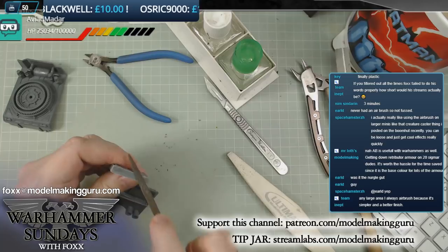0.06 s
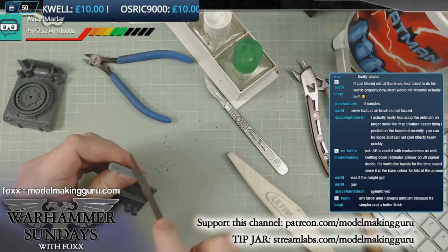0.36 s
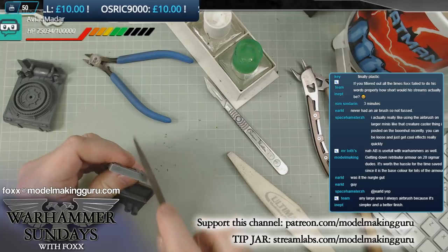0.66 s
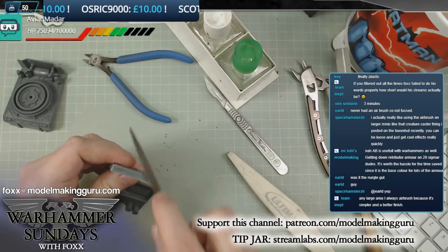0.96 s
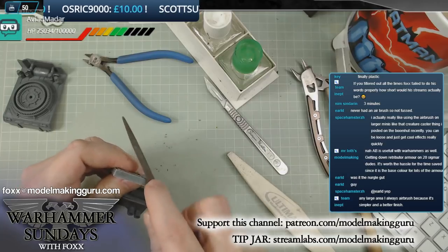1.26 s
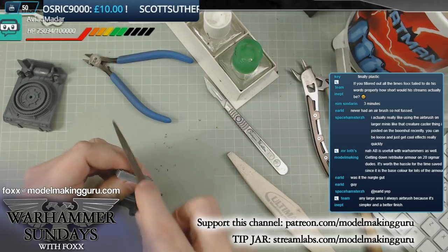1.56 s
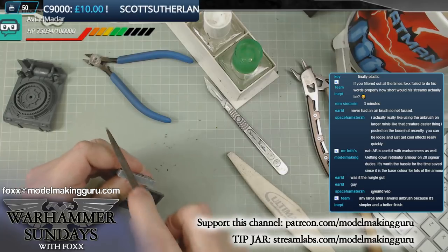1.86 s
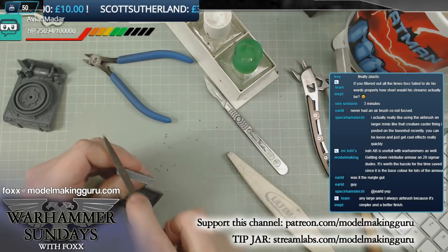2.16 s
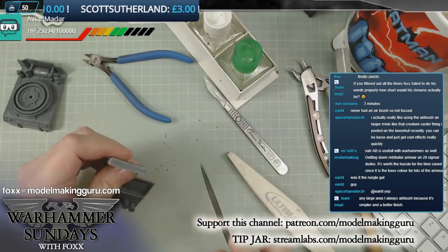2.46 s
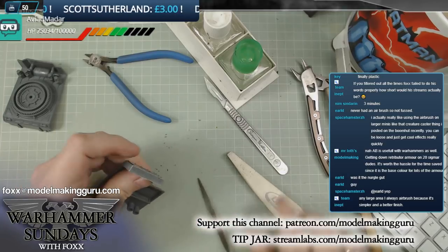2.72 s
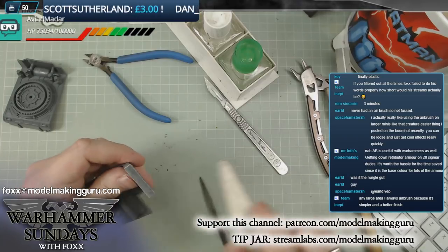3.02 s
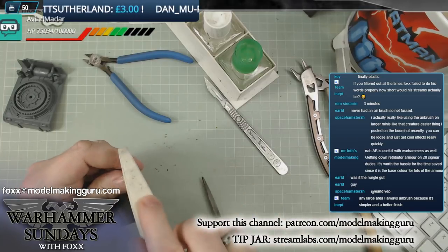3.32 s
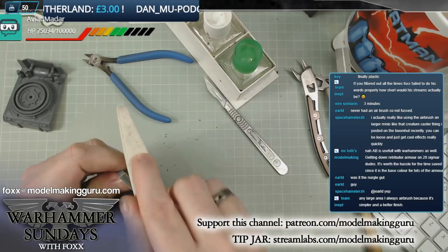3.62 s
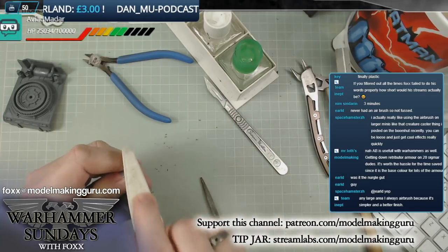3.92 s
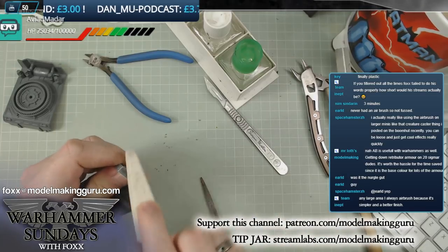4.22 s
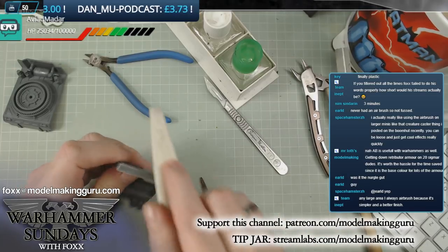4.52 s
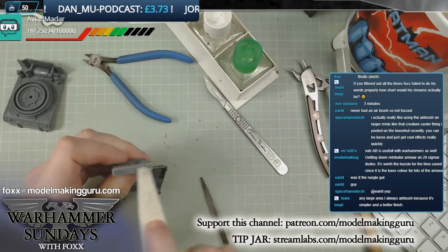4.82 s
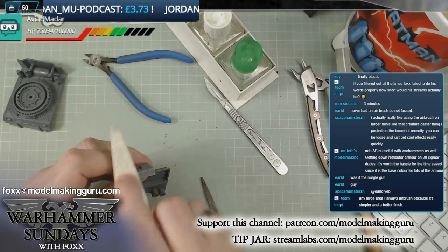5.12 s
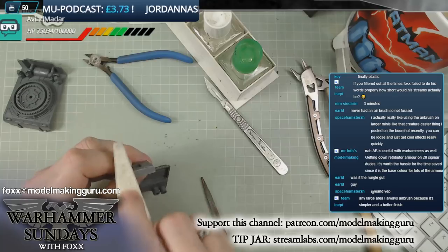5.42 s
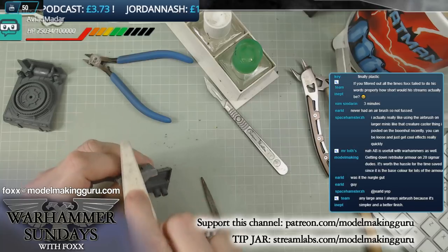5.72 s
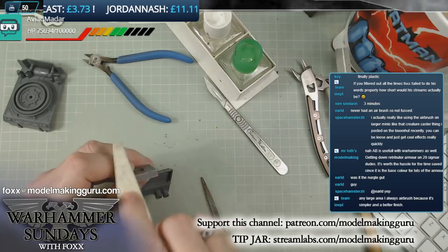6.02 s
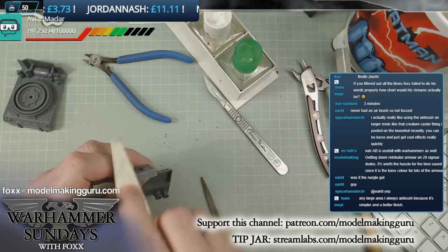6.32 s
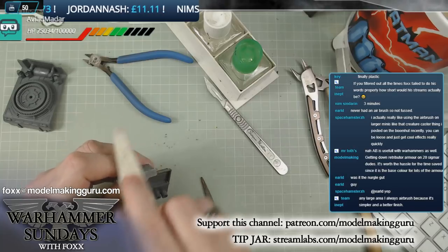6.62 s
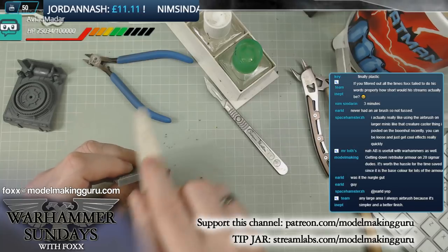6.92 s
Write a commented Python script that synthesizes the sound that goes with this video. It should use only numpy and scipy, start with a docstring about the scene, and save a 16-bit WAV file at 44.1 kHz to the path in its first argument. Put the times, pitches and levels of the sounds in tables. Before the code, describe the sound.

Close, dry filing on hollow plastic, a clack and thump on a desk, then gritty sanding strokes that get faster and louder.

```python
"""A small hollow plastic model part is smoothed by hand over a desk, in a quiet dry room.
First come seven strokes of a metal file: the blade lands with a tick, then its teeth catch the
plastic in tiny snaps that make the part ring. The file is put down, and the desk clacks and booms.
Next the grit of a sanding stick scrapes the part in three slow strokes. The fingers turn the part
with a dull pop and a faint rub, and seven quicker, harder strokes follow on another edge."""
import sys
import numpy as np
from scipy import signal
from scipy.fft import rfft, irfft, next_fast_len
from scipy.io import wavfile

SR = 44100
rng = np.random.default_rng(int(sys.argv[2]) if len(sys.argv) > 2 else 0)


def store_wav(level_fs):
    """Save 16-bit WAV to argv[1]."""
    pcm = np.round(np.clip(np.atleast_2d(level_fs), -1, 1) * 32767)
    wavfile.write(sys.argv[1], SR, pcm.T.astype(np.int16))


N = 307377

# The broad tone colour of each sound: (frequency [Hz], level [dB])
AIR_SPECTRUM = [(120, -27.5), (200, -0.5), (721, -5), (1130, -6), (1330, -4.5), (1510, -10.5),
                (3120, -10.5), (5860, -26.5), (15000, -18.5)]
RUMBLE_SPECTRUM = [(40, -12.5), (100, 1), (155, -4), (200, -10.5), (300, -15.5), (450, -23), (900, -38.5),
                   (2000, -65.5)]
SWAY_SPECTRUM = [(5, -2.5), (12, 7.5), (25, -12), (55, -16.5), (100, -18), (300, -70)]
FINGER_SPECTRUM = [(200, -24.5), (450, 4), (700, -17.5), (1100, 0), (1750, -2), (2100, -30.5), (5000, -44)]
CLACK_SPECTRUM = [(100, -20.5), (300, -0.5), (520, -4.5), (750, -7.5), (1350, -3), (1900, -16.5),
                  (4500, -12.5), (7000, -18.5), (9500, -38), (15000, -57)]
TICK_SPECTRUM = [(200, -26.5), (600, -15.5), (1200, -1), (2700, 11.5), (4200, 9.5), (5800, -3.5),
                 (7300, 0.5), (8800, -21), (10000, -39), (15000, -54)]
FILE_FRICTION = [(150, 4), (330, -28.5), (500, -2.5), (780, -8), (900, -20), (1350, -14.5), (2100, -3.5),
                 (3100, -5.5), (5200, -1), (6300, -3.5), (8200, -4), (9500, -7.5), (12000, -9),
                 (15500, -33.5)]
SLOW_FRICTION = [(150, -16.5), (350, -12.5), (580, -4), (860, -33.5), (1350, -18.5), (1900, 5.5), (2200, 4),
                 (2800, 14.5), (4800, 9.5), (6100, 0.5), (8800, 0.5), (10400, -18), (13000, -18.5),
                 (15500, -66)]
QUICK_FRICTION = [(200, -45), (480, -26), (800, -19.5), (900, -29), (1350, -25.5), (1900, -13.5),
                  (2200, -16), (2750, -4.5), (3900, -12), (5600, -20), (8000, -8.5), (10000, -18),
                  (12500, -19.5), (15500, -32.5)]
# Resonances, the narrow peaks (or dips) on top of that colour: (frequency [Hz], width [Hz], boost [dB])
AIR_HUM = [(286, 17, 22)]
RUMBLE_RESONANCES = [(162, 38, 14), (179, 25, 1.6)]
FINGER_RESONANCES = [(420, 80, 28), (1710, 65, 15)]
CLACK_RESONANCES = [(263, 110, 10), (360, 210, 4.5), (560, 110, -2.5), (636.5, 55, 9), (775, 100, 8),
                    (920, 46, -1), (1230, 57, -1), (1280, 35, -0.5), (1473, 55, 3.5), (2150, 590, 8),
                    (2530, 200, 0)]
TICK_RESONANCES = [(1165, 60, 13.5), (1673, 230, 9), (3713, 150, 6), (3960, 250, -10), (7220, 220, -10)]
FILE_RESONANCES = [(1075, 314, 33), (1559, 170, 25), (2820, 240, 4), (3681, 130, 11), (4055, 180, -21),
                   (4550, 96, 4), (6800, 570, 8.5)]
SLOW_RESONANCES = [(1060, 510, 41.5), (1562, 140, 16.5), (3360, 180, -1), (3960, 220, -5)]
QUICK_RESONANCES = [(1042, 270, 25), (1630, 280, 12), (2375, 310, 8.5), (2934, 1100, 8), (4760, 1160, 15),
                    (4980, 290, -16.5), (5443, 1800, 14.5)]
# The room's echo; a fade time, or t60, is how long a drop of 60 dB takes: (frequency [Hz], fade time [s])
ROOM_FADE = [(200, 0.42), (1200, 0.22), (3500, 0.16), (8000, 0.13), (15000, 0.22)]
# The desk rumbles as the forearms settle on it after the change of tools: (time [s], level [dB])
LEANING = [(3.1, -53), (3.226, -62.5), (4.316, -74.5), (4.586, -77), (5.0, -90.5)]
# Fingertips slide as the part is turned: (time [s], level [dB])
FINGER_RUB = [(4.725, -120), (4.74, -76.5), (4.79, -87), (4.87, -83.5), (4.99, -85.5), (5.05, -120)]
# Tools slide over the mat as they are swapped: (time [s], length [s], pitch [Hz], level [dB])
SLIDES = [(2.783, 0.13, 5600, -75), (2.89, 0.087, 3170, -63.5), (2.986, 0.06, 3870, -65),
          (3.07, 0.081, 4750, -67.5)]
# The part shifts in the fingers: (time [s], level [dB], pitch [Hz])
GRIP_POPS = [(4.735, -58, 472), (5.692, -60.5, 330), (6.008, -58.5, 310), (6.303, -56, 320),
             (6.578, -82, 356), (6.792, -50, 460), (6.808, -49, 436)]
# The tones the desk top rings with: (frequency [Hz], level [dB], fade time [s])
DESK_TONES = [(57.34, -4, 0.64), (109.5, -11, 0.33), (153, 1.5, 0.2), (189, -2, 0.14), (233, -7, 0.054),
              (273, -13, 0.047), (282, -12, 0.057), (325, -2.5, 0.099), (676, -13, 0.11), (782, -20, 0.09),
              (1270, -22.5, 0.078), (1334, -14.5, 0.04), (1460, -19, 0.097), (2080, -27.5, .07)]
# Blows on the desk: (time [s], thud gain [dB], clack level [dB], clack's treble limit [Hz])
KNOCKS = [(0.841, -46.5, -86, 890), (2.559, -43.5, -41, 3270), (2.569, -58, -54, 1470),
          (2.617, -35.5, -50.5, 866), (2.6639, -31, -28.5, 3940), (2.6768, -53, -33.5, 1770),
          (2.7, -36.5, -46.5, 2350), (2.804, -64, -57, 1160), (2.82, -30.5, -41.5, 2640),
          (2.824, -21, -55, 484), (2.85, -54.5, -49, 4000), (2.957, -64, -64, 917),
          (3.015, -66.5, -60.5, 775), (3.097, -47, -42, 1940), (3.133, -54, -53.5, 1110),
          (3.25, -50, -56.5, 800), (3.412, -64, -55, 1200), (3.53, -53.5, -63, 1110),
          (3.569, -56.5, -55.5, 1210), (3.667, -51.5, -75.5, 980), (3.712, -49.5, -61, 1120),
          (3.744, -60, -74, 1220), (3.819, -57, -79.5, 1380), (4.002, -55.5, -72, 1200),
          (4.101, -51, -86, 1200), (4.238, -56.5, -97, 1200), (4.511, -60.5, -86.5, 1195),
          (4.66, -63, -85, 1200)]
# The tool lands or catches an edge:
# (time [s], click level [dB], ring over click [dB], hiss over click [dB], boosted pitch [Hz])
TICKS = [(0.0401, -44, -19.5, -11, 3700), (0.391, -51, -16, -45, 3480), (0.739, -52.5, -9, -21, 2750),
         (0.796, -57, -30, -9, 5600), (1.104, -52.5, -6.5, -32, 3640), (1.438, -52, -12, -33, 4000),
         (1.76, -54, -9, -23.5, 4540), (2.068, -57, 1, -9.5, 1550), (2.191, -52.5, -5, -5.5, 3000),
         (2.329, -83, 13.5, -28, 1700), (3.332, -62.5, -3, -34, 1860), (3.732, -75.5, 9.5, -35, 1070),
         (3.866, -58, -6.5, -27, 3320), (4.099, -64, -8, -20, 3000), (4.248, -80.5, -4, -31, 2860),
         (4.462, -62, -21, -13.5, 3580), (4.735, -82.5, 25.5, -27, 1434), (4.995, -69, 0, -36, 2420),
         (5.373, -72, -1.5, -32, 1980), (5.582, -62.5, -11, -18, 3020), (5.691, -61, -4, -41, 1850),
         (5.886, -60, -10, -18, 4460), (6.005, -59.5, -10, -41, 2430), (6.187, -56.5, -7.5, -26, 3070),
         (6.301, -58, -9.5, -30, 3523), (6.467, -58, -6.5, -18, 3240), (6.577, -61.5, -11, -26, 2370),
         (6.741, -54.5, -12, -34, 4600), (6.806, -61, 4, -30, 1690), (6.838, -62, 4, -34, 1770),
         (6.881, -51.5, -3, -25, 2800)]
# Moves of the tool: (start [s], fastest moment [s], end [s], scrape level [dB], ring over scrape [dB],
# hiss over scrape [dB], pitch boosted by the point of contact [Hz], its boost [dB], desk rumble [dB])
FILE_STROKES = [(0.05, 0.146, 0.22, -52, -9, -14, 3720, 9, -70),
                (0.409, 0.511, 0.55, -49.5, -10, -14.5, 3650, 7.5, -64),
                (0.756, 0.824, 0.85, -50, -6, -11.5, 3625, 10, -61),
                (1.097, 1.176, 1.243, -49.5, -8, -12.5, 3590, 8.5, -75),
                (1.45, 1.511, 1.606, -50.5, -4.5, -18, 3800, 4.5, -65),
                (1.763, 1.842, 1.943, -56.5, -9, -24.5, 5600, 4.5, -76.5),
                (2.104, 2.212, 2.268, -51.5, -7, -19, 2960, 3.5, -70)]
SLOW_STROKES = [(3.406, 3.553, 3.622, -48.5, -7.5, -19, 640, 12, -64.5),
                (3.881, 3.992, 4.11, -48.5, -7, -14.5, 4430, 2.5, -68.5),
                (4.275, 4.368, 4.492, -46, -10.5, -14, 4560, 6.8, -74)]
QUICK_STROKES = [(5.024, 5.137, 5.212, -42.5, -7, -21.5, 2650, 5.7, -90),
                 (5.395, 5.492, 5.59, -40.5, -11, -20, 3800, 1.9, -99),
                 (5.72, 5.805, 5.89, -40.5, -12.3, -20, 2480, 1, -91),
                 (6.02, 6.094, 6.188, -39.5, -14.5, -16, 4420, 1.7, -87),
                 (6.312, 6.389, 6.485, -39.5, -13.5, -16.5, 3500, 2.4, -78),
                 (6.593, 6.652, 6.74, -38.3, -17.5, -17, 4759, 3.6, -86),
                 (6.777, 6.832, 6.885, -58.5, -3, -43, 433, 18, -73),
                 (6.851, 6.935, 6.985, -39.5, -14, -15.5, 4700, 3.1, -74.5)]


def from_db(db):
    """Turn decibels into a number to multiply a sound by."""
    return 10 ** (np.asarray(db) / 20)


def rms(x):
    """The average strength of a sound (root mean square)."""
    return np.sqrt(np.mean(x ** 2) + 1e-24)


def at_hz(points, hz):
    """Read between the rows of a table, with every octave equally wide."""
    frequencies, values = np.transpose(points)
    return np.interp(np.log(np.maximum(hz, 1)), np.log(frequencies), values)


def keep_band(x, hz, kind, order=2):
    """Keep the lows, the highs or a band in between."""
    return signal.sosfilt(signal.butter(order, hz, kind, fs=SR, output="sos"), x)


def drift(rate_hz):
    """A random wobble of strength 1 that heads for a new value rate_hz times a second."""
    wobble = np.interp(np.arange(N) / SR * rate_hz, np.arange(N), rng.standard_normal(N))
    return wobble / rms(wobble)


def response(spectrum, resonances=(), size=8192):
    """How an object with this colour and these resonances answers one sharp tap."""
    hz = np.arange(size // 2 + 1) * SR / size
    peaks_db = sum(db / (1 + (2 * (hz - centre) / width) ** 2) for centre, width, db in resonances)
    cepstrum = irfft(np.log(from_db(at_hz(spectrum, hz) + peaks_db)))
    # folding the second half onto the first puts all the ringing after the tap
    cepstrum[1:size // 2] *= 2
    cepstrum[size // 2 + 1:] = 0
    return irfft(np.exp(rfft(cepstrum)))


def through(x, tap_response):
    """Pass a sound through an object or a room."""
    return signal.fftconvolve(x, tap_response)[:len(x)]


def noise(spectrum, resonances=()):
    """Noise of a given colour and strength 1."""
    x = through(rng.standard_normal(N), response(spectrum, resonances))
    return x / rms(x)


def add(out, start_s, sound):
    """Mix a sound in at a given time."""
    i = int(start_s * SR)
    out[i:i + len(sound)] += sound[:N - i]


def split_bands(x):
    """Split a sound into the hollow ring (low), the bite (middle) and the fine hiss (high)."""
    size = next_fast_len(len(x) + 512)
    hz, spectrum = np.arange(size // 2 + 1) * SR / size, rfft(x, size)
    below_bite, below_hiss = (1 / (1 + (hz / edge_hz) ** 18) for edge_hz in (2000, 7800))
    shares = below_bite, below_hiss - below_bite, 1 - below_hiss
    return [irfft(spectrum * share, size)[:len(x)] for share in shares]


def strike(chatter, t60, size=6000):
    """One sharp push followed by a quickly dying chatter."""
    force = chatter * rng.standard_normal(size) * from_db(-60 * np.arange(size) / SR / t60)
    force[0] += 1
    return force


def grip(resonances, shift, fine_db, fine_width_hz, count=70):
    """Each new hold on the part retunes its main resonances a little and brings out other small ones."""
    main = [(hz * np.exp(shift * rng.standard_normal()), width, db) for hz, width, db in resonances]
    fine_hz = np.geomspace(1900, 15000, count) * rng.uniform(.985, 1.015, count)
    widths = fine_width_hz * np.sqrt(fine_hz / 4000)  # wider above 4000 Hz, narrower below
    return main + list(zip(fine_hz, widths, fine_db * rng.standard_normal(count)))


def hand_speed(start, fastest, end, creep=0.05):
    """The hand speeds up to about 1 and slows down again, creeping a little at either end."""
    t = np.arange(N) / SR
    arch = np.sin(np.pi * np.interp(t, [start, fastest, end], [0, .5, 1]))
    touching = np.interp(t, [start - 0.035, start, end, end + 0.0086], [0, 1, 1, 0])
    return np.hypot(arch, creep) * touching


def room(x, delay_s, echo_db=-16.5):
    """The room adds a faint wash of echo that dies sooner in the treble than in the bass."""
    t, edges = np.arange(SR // 2) / SR, np.geomspace(150, 16000, 8)
    tail = 0
    for low, high in zip(edges, edges[1:]):
        fade = from_db(-60 * t / at_hz(ROOM_FADE, np.sqrt(low * high)))
        tail += keep_band(rng.standard_normal(len(t)), [low, high], "band") * fade
    tail *= np.clip(t / delay_s - 1, 0, 1)
    return x + from_db(echo_db) * through(x, tail / np.linalg.norm(tail))


def room_air(level_db=-94):
    """The air in the room gives a steady hush with a faint hum."""
    return from_db(level_db) * noise(AIR_SPECTRUM, AIR_HUM)


def arm_rumble(rest_db=-92.5, sway_db=-65, swell_db=2.5, lag_s=0.027):
    """The working arms shake the desk and sway the microphone standing on it, stroke by stroke."""
    times, lean_db = np.transpose(LEANING)
    shake = from_db(rest_db) + np.interp(np.arange(N) / SR, times, from_db(lean_db), left=0, right=0)
    effort, carry = 0, np.exp(-1 / (lag_s * SR))
    for start, fastest, end, *_, rumble_db in FILE_STROKES + SLOW_STROKES + QUICK_STROKES:
        # the desk picks up each push a little late and lets it die away
        push = signal.lfilter([1 - carry], [1, -carry], hand_speed(start, fastest, end) ** 2 + 1e-12)
        shake += from_db(rumble_db) * push
        effort += push
    rumble = shake * noise(RUMBLE_SPECTRUM, RUMBLE_RESONANCES)
    sway = from_db(sway_db + swell_db * effort) * noise(SWAY_SPECTRUM)
    return rumble + sway


def finger_rub(rough_db=2.0):
    """Skin drags unevenly on the plastic and makes the hollow inside sound."""
    level_db = np.interp(np.arange(N) / SR, *np.transpose(FINGER_RUB))
    return from_db(level_db + rough_db * drift(59)) * noise(FINGER_SPECTRUM, FINGER_RESONANCES)


def tool_slides(rough_db=2.5):
    """A tool scuffs over the cutting mat in short, uneven swishes."""
    out, roughness = np.zeros(N), from_db(rough_db * drift(210))
    for start, length, hz, db in SLIDES:
        swish = keep_band(rng.standard_normal(SR // 2), [hz * 0.92, hz * 1.116], "band")
        swell = np.hanning(int(length * SR))
        add(out, start, from_db(db) * swell * swish[:len(swell)] / rms(swish))
    return out * roughness / rms(roughness)


def grip_pops(t60=0.062, lower_ratio=0.51, lower_db=-17.0):
    """The shifting part pops with two low tones, which the fingers muffle at once."""
    out, t = np.zeros(N), np.arange(SR // 5) / SR
    for start, db, hz in GRIP_POPS:
        phase = 2 * np.pi * hz * t
        tones = np.sin(phase) + from_db(lower_db) * np.sin(phase * lower_ratio)
        add(out, start, from_db(db - 60 * t / t60) * tones)
    return out


def desk_knocks(press_s=0.00072):
    """Each blow sets the desk top booming under a short clack."""
    out, t = np.zeros(N), np.arange(SR) / SR
    boom = sum(from_db(db - 60 * t / t60) * np.sin(2 * np.pi * hz * t) for hz, db, t60 in DESK_TONES)
    boom *= 1 - np.exp(-t / press_s)
    surface = response(CLACK_SPECTRUM, CLACK_RESONANCES)
    for start, thud_db, clack_db, limit_hz in KNOCKS:
        clack = through(strike(chatter=0.16, t60=0.053), surface)
        clack = keep_band(clack, limit_hz, "low", order=3)
        add(out, start, from_db(clack_db) * clack / rms(clack[:SR // 100]))
        # a softer blow wakes only the lower tones
        add(out, start, from_db(thud_db) * keep_band(boom, limit_hz * 0.16, "low"))
    return keep_band(out, 63, "high", order=4)  # the deepest lows are cut away, which also thins the lowest boom


def tool_ticks(landing_s=0.001, lead_samples=220, click_samples=530):
    """A landing tool grazes the part, then strikes; where it lands boosts one resonance."""
    out = np.zeros(N)
    rise = np.exp(-np.arange(lead_samples)[::-1] / SR / landing_s)
    for time, click_db, ring_db, hiss_db, hz in TICKS:
        graze = 0.063 * rng.standard_normal(lead_samples) * rise
        force = np.concatenate([graze, strike(chatter=0.35, t60=0.032)])
        held = grip(TICK_RESONANCES, shift=0.0067, fine_db=4.5, fine_width_hz=259)
        click = through(force, response(TICK_SPECTRUM, held + [(hz, 380, 5)]))
        for band, band_db in zip(split_bands(click), (ring_db, 0, hiss_db)):
            strength = rms(band[lead_samples:lead_samples + click_samples])
            add(out, time - lead_samples / SR, band / strength * from_db(click_db + band_db))
    return out


def scrape(strokes, friction, resonances, snaps_per_s, snap_spread_db, judder_db, judder_hz,
           wander_db, fine_db, speed_powers, ring_lead_s, hiss_lag_s, contact_width_hz=235):
    """Teeth or grit catch the plastic in tiny snaps that ring the part; faster is louder and brighter."""
    out = np.zeros(N)
    caught = rng.random(N) < snaps_per_s / SR
    snaps = caught * rng.choice([-1, 1], N)
    snaps = snaps * from_db(snap_spread_db * np.minimum(rng.exponential(1, N), 4))
    snaps *= from_db(judder_db * drift(judder_hz))  # the tool grips and slips as it travels
    # the point of contact wanders, so ring, bite and hiss each swell a little on their own
    wanders = [wander_db * drift(60) for _ in range(3)]
    for start, fastest, end, scrape_db, ring_db, hiss_db, contact_hz, boost_db, _ in strokes:
        # the ring peaks before the bite (after it if the lead is negative); the hiss peaks after it
        speeds = [hand_speed(start, np.clip(fastest + delay, start, end), end)
                  for delay in (-ring_lead_s, 0, hiss_lag_s)]
        touching = speeds[1] > 0
        held = grip(resonances, shift=0.0034, fine_db=fine_db, fine_width_hz=59)
        body = response(friction, held + [(contact_hz, contact_width_hz, boost_db)])
        bands = split_bands(through(snaps[touching], body))
        levels = ring_db, 0, hiss_db
        for band, db, wander, speed, power in zip(bands, levels, wanders, speeds, speed_powers):
            gain = speed[touching] ** power * from_db(scrape_db + db + wander[touching])
            out[touching] += gain * band / rms(band)
    return out


def scene():
    """Filing, the change of tools and sanding, heard close up in one channel."""
    filing = scrape(FILE_STROKES, FILE_FRICTION, FILE_RESONANCES, snaps_per_s=4000,
                    snap_spread_db=2.0, judder_db=1.5, judder_hz=151.3, wander_db=2.3, fine_db=4.5,
                    speed_powers=(1.15, 1.65, 2.3), ring_lead_s=0.0022, hiss_lag_s=0.003)
    slow_sanding = scrape(SLOW_STROKES, SLOW_FRICTION, SLOW_RESONANCES, snaps_per_s=12000,
                          snap_spread_db=2.5, judder_db=0.5, judder_hz=162, wander_db=0.95, fine_db=2.1,
                          speed_powers=(1.1, 1.5, 2.2), ring_lead_s=-0.01, hiss_lag_s=0.012)
    quick_sanding = scrape(QUICK_STROKES, QUICK_FRICTION, QUICK_RESONANCES, snaps_per_s=14000,
                           snap_spread_db=2.0, judder_db=0.87, judder_hz=172.8, wander_db=0.7,
                           fine_db=3.5, speed_powers=(1.3, 1.95, 3.1),
                           ring_lead_s=0.016, hiss_lag_s=0.016)
    handling = grip_pops() + finger_rub() + tool_slides()
    handwork = filing + slow_sanding + quick_sanding + tool_ticks() + handling
    desk = desk_knocks()
    background = arm_rumble() + room_air()
    return (room(handwork, delay_s=0.0058) + room(desk, delay_s=0.0062) + background)[None]


def record(dry, cutoff_hz=15650):
    """The very highest treble is cut off steeply."""
    return signal.sosfilt(signal.ellip(10, .1, 80, cutoff_hz, fs=SR, output="sos"), dry)


dry = scene()
out = record(dry)
store_wav(out)
```